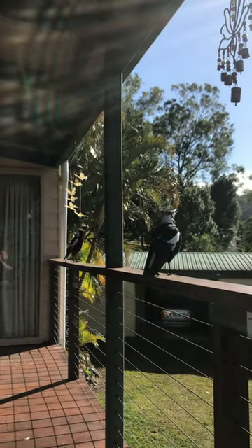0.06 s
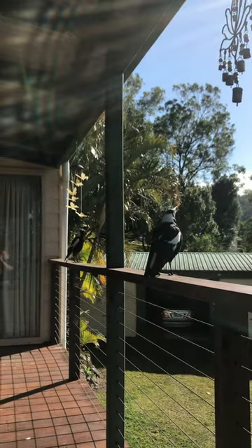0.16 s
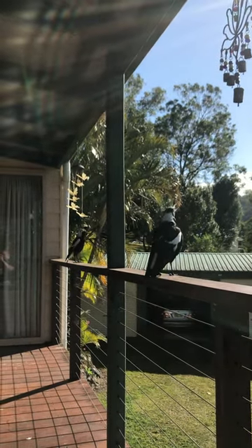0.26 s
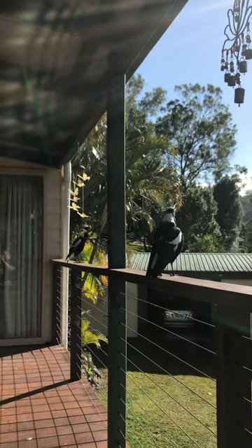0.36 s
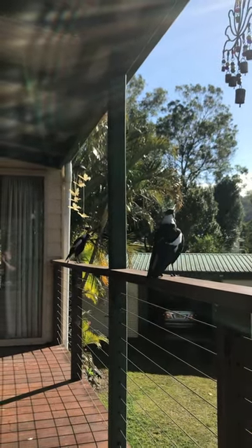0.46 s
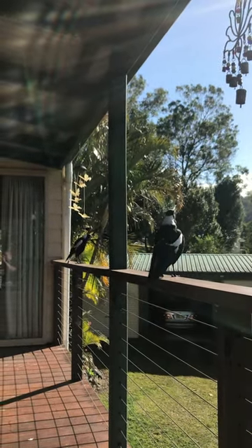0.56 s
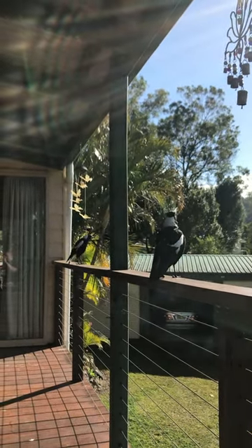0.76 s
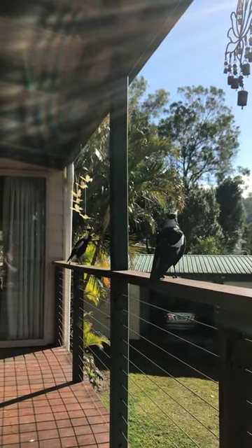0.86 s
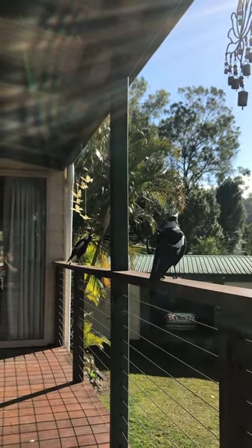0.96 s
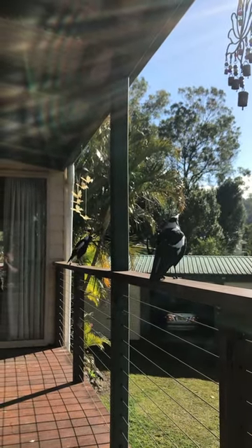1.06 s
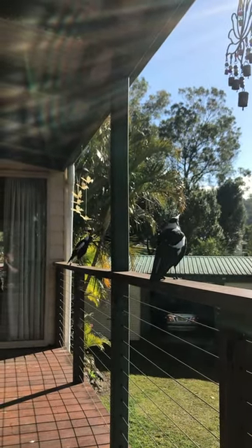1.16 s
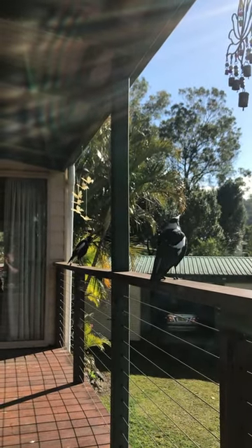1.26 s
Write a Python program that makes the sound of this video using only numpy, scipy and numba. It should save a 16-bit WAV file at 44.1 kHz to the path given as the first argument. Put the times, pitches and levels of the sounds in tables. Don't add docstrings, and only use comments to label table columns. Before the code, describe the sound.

One loud raspy magpie call drops a step and echoes off a veranda, faint birds beyond

```python
import sys
import numpy as np
from scipy import signal
from scipy.io import wavfile
from scipy.ndimage import uniform_filter1d
from numba import njit

SR = 44100
rng = np.random.default_rng(int(sys.argv[2]) if len(sys.argv) > 2 else 0)


def natural_amplitude(level_db):
    exponent = np.asarray(level_db, float) / 20
    return 10 ** exponent


def waveform_to_disk(signal):
    frames = np.transpose(np.atleast_2d(signal))
    scaled = np.clip(frames, -1, 1) * 32767
    samples = np.round(scaled).astype(np.int16)
    wavfile.write(sys.argv[1], SR, samples)


N = 57330
T = np.arange(N) / SR

# time in seconds, scale of the tract resonances, treble in dB,
# throat in dB, flutter swing of the overtones in rad.
BEAK = [(.2, 1.2, -30, -4, .5), (.235, 1.16, -15, -4, .45), (.27, 1.08, -2, -1, .25),
        (.32, 1.025, 0, -7, .03), (.36, 1.01, 0, -5, .03), (.5, 1, 0, 0, 0), (.56, 1, 0, 4, 0),
        (.72, .99, 0, 8, 0)]
ROOF_HZ = 1117


def rms_one(x):
    return x / np.sqrt(np.mean(x ** 2) + 1e-20)


def in_time(rows):
    seconds, *columns = np.transpose(rows)
    return [np.interp(T, seconds, column) for column in columns]


def drift(rate_hz):
    r = np.exp(-2 * np.pi * rate_hz / SR)
    return rms_one(signal.lfilter([1], [1, -2 * r, r * r], rng.standard_normal(N + SR))[SR:])


def phase_of(hz):
    return 2 * np.pi * np.cumsum(hz) / SR


def gate(start, length, edge):
    return np.clip(np.minimum(T - start, start + length - T) / edge, 0, 1) ** 2


def band_pass(x, order, low_hz, high_hz):
    return signal.sosfilt(signal.butter(order, [low_hz, high_hz], "band", fs=SR, output="sos"), x)


@njit
def resonate(x, cosw, r):
    y = np.zeros(len(x))
    for i in range(2, len(x)):
        y[i] = (1 - r * r) / 2 * (x[i] - x[i - 2]) + 2 * r * cosw[i] * y[i - 1] - r * r * y[i - 2]
    return y


def cavity(x, hz, width_hz):
    cosw = np.cos(2 * np.pi * hz * np.ones(N) / SR)
    return resonate(x, cosw, np.exp(-np.pi * width_hz / SR))


def town_and_air():
    # frequency in Hz, level in dB.
    spectrum = [(26, 5), (45, 1.5), (249, -3.5), (979, -22.5), (1130, -1), (1990, -24.5), (2480, -17),
                (4910, -27.5), (15500, -38)]
    table_hz, table_db = np.transpose(spectrum)
    edges_hz = 28 * 2 ** np.arange(0, 9.6, .5)
    white = rng.standard_normal((2, N + SR))
    out = 0
    for k, (low, high) in enumerate(zip(edges_hz, edges_hz[1:])):
        band = band_pass(white[k % 2], 2, low, high)[SR:]
        band_db = np.interp(np.log(low * high) / 2, np.log(table_hz), table_db)
        out = out + natural_amplitude(band_db + 0.47 * drift(2.2)) * band
    return natural_amplitude(-55.5) * rms_one(out)


def rustle():
    start_db, t60_s = -65, .5
    noise = band_pass(rng.standard_normal(N), 2, 1800, 6600)
    return natural_amplitude(start_db - 60 * T / t60_s) * rms_one(noise)


def whistle(start, length, hz, db, wobble_hz=12, edge=.015, flicker_db=2.0):
    level = natural_amplitude(db + flicker_db * drift(37)) * gate(start, length, edge)
    return np.sqrt(2) * level * np.cos(phase_of(hz + wobble_hz * drift(30)))


def echoes(x, t60_s, db, cut_hz, delay_s):
    tail = rng.standard_normal(N) * natural_amplitude(-60 * T / t60_s) * (T > delay_s)
    tail = signal.sosfilt(signal.butter(2, cut_hz, fs=SR, output="sos"), tail)
    tail = tail / np.sqrt(np.sum(tail ** 2))
    return natural_amplitude(db) * signal.fftconvolve(x, tail)[:N]


def far_birds():
    # start in seconds, length in seconds, frequency in Hz, level in dB.
    far_calls = [
        (-.01, .055, 1580, -64),
        (.055, .04, 1430, -64),
        (.13, .035, 955, -55),
        (.165, .04, 955, -57),
        (.78, .18, 4500, -77),
        (.9, .16, 1015, -59),
        (1.15, .15, 1115, -67),
    ]
    calls = sum(whistle(*row) for row in far_calls)
    return calls + echoes(calls, 0.14, -4.5, 2000, 0.03)


def tract(x):
    # frequency in Hz, width in Hz, level in dB.
    resonances = [(1909, 374, 6), (2617, 190, -6.5), (3320, 480, 4), (3765, 340, 4.5), (5453, 940, 6),
                  (6175, 200, -19.5), (7170, 250, 4.5), (9100, 440, -5.5), (10040, 1500, -6.5),
                  (11440, 1170, 3.5), (14200, 1300, -4)]
    # frequency in Hz, width in Hz, share cut.
    notches = [(4400, 350, .7), (9700, 400, .5), (13300, 1300, .98), (2550, 500, .8)]
    scale, treble_db, throat_db, _ = in_time(BEAK)
    out = 0
    for k, (hz, width_hz, db) in enumerate(resonances):
        centre_hz = hz * scale if 1 < k < 6 else hz
        level_db = db + treble_db * (k > 3 or k == 2) + throat_db * (k < 1)
        once = cavity(x, centre_hz, width_hz)
        out = out + natural_amplitude(level_db) * cavity(once, centre_hz, width_hz)
    for hz, width_hz, share in notches:
        centre_hz = hz * (scale if hz < 5000 else np.sqrt(scale))
        out = out - share * cavity(out, centre_hz, width_hz)
    return out


def note(rows, swing=0):
    # time in seconds, flutter in Hz, sidebands in dB, roughness 0 to 1.
    flutter_path = [(.2, 138, -3, .3), (.235, 132, -9, .25), (.26, 119, -12, .25), (.295, 135, -18, .2),
                    (.34, 150, -24, .12), (.38, 165, -19, .06), (.42, 181, -23, .05), (.5, 188, -20, .06),
                    (.55, 184, -19, .5), (.72, 180, -12, .6)]
    # multiple of the flutter, level in dB.
    sidebands = [(-4, -24), (-3, -24), (-2, -22), (-1, 0), (1, -2), (2, -19)]
    hz, tone_db, rasp_db = in_time(rows)
    flutter_hz, side_db, rough = in_time(flutter_path)
    edge_s = .008
    on = gate(rows[0][0] - edge_s / 2, rows[-1][0] - rows[0][0] + 2 * edge_s, edge_s)
    phase = phase_of(hz + 8 * rough * drift(44))
    flutter = phase_of(flutter_hz * (1 + .26 * rough * drift(50)))

    sides = 0
    for k, db in sidebands:
        loss_db = 17.5 * (k > 0) * rough * (swing > 0)
        sides = sides + natural_amplitude(db - loss_db) * np.cos(phase + k * flutter + k * k * swing)
    skirt = cavity(np.cos(phase) * drift(174), 993 * hz / hz[-1], 140)
    tone = np.cos(phase) + natural_amplitude(side_db + 2.4 * rough * drift(23)) * sides + rough * skirt
    shimmer_db = 4.5 * rough * drift(56)
    tone = np.sqrt(2) * natural_amplitude(tone_db + shimmer_db) * tone
    tone = band_pass(tone, 4, 760, 1900)

    shaken = phase + (swing + in_time(BEAK)[3]) * np.sin(flutter)
    comb = sum(np.cos(n * shaken + n * n) / (1 + (n / 7) ** 4) for n in range(2, 14))
    breath = natural_amplitude(3) * (.3 + rough) * rng.standard_normal(N)
    pulses = np.exp(.3 * np.cos(flutter))
    rasp = tract(pulses * (rms_one(comb) + breath))
    evened = rasp / np.sqrt(uniform_filter1d(rasp ** 2, size=1500))
    lump_db = 3.5 * rough * drift(34)
    return on * (tone + natural_amplitude(rasp_db + 0.01 + lump_db) * evened)


def magpie():
    # time in seconds, pitch in Hz, whistle in dB, rasp in dB.
    high_path = [
        (0.198, 1275, -50, -66),
        (0.216, 1323, -28, -43),
        (0.23, 1342, -25, -35),
        (0.268, 1331, -22, -34),
        (0.286, 1312, -16, -33),
        (0.34, 1286, -20, -28),
        (0.358, 1287, -35, -32),
    ]
    # time in seconds, pitch in Hz, whistle in dB, rasp in dB.
    low_path = [
        (0.35, 1183, -20.5, -80),
        (0.368, 1165, -14.5, -36.5),
        (0.468, 1130, -12.5, -37.5),
        (0.528, 1118, -22.5, -40.5),
        (0.618, 1118, -20.5, -40.5),
        (0.682, 1117, -31.5, -45.5),
        (0.698, 1121, -30.5, -52),
        (0.722, 1101, -45.5, -62),
    ]
    # start in seconds, length in seconds, frequency in Hz, level in dB.
    croak = (.2, .14, 727, -48)
    side_tone = whistle(*croak, wobble_hz=16, edge=0.014, flicker_db=5.0)
    return note(high_path) + note(low_path, swing=1.05) + side_tone


def roof_ring(x):
    t60_s = .9
    return natural_amplitude(-12) * cavity(x, ROOF_HZ, np.log(1000) / (np.pi * t60_s))


def veranda_and_yard(bird):
    yard = echoes(bird, 0.69, -20, 5300, 0.011)
    yard = yard - .7 * cavity(yard, ROOF_HZ, 50)
    roof = echoes(bird, .08, -18, 6000, .004)
    return yard + roof + roof_ring(bird)


def distant_hum():
    hum_tone = (.48, .6, 188, -58)
    return whistle(*hum_tone, wobble_hz=2.0, edge=0.099)


def scene():
    background = town_and_air() + rustle() + far_birds() + distant_hum()
    bird = magpie()
    return (background + bird + veranda_and_yard(bird))[None]


def band_limit(x):
    return signal.sosfilt(signal.butter(12, 15640, fs=SR, output="sos"), x)


def record(dry):
    x = signal.sosfilt(signal.butter(4, 44, "high", fs=SR, output="sos"), dry)
    x = signal.sosfilt(signal.ellip(12, .5, 70, 15750, fs=SR, output="sos"), x)
    return band_limit(x)


dry = scene()
out = record(dry)
waveform_to_disk(out)
```